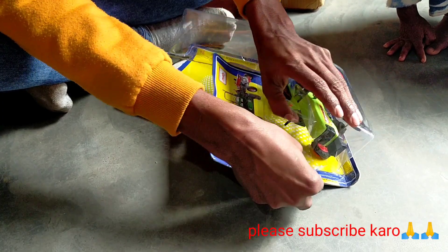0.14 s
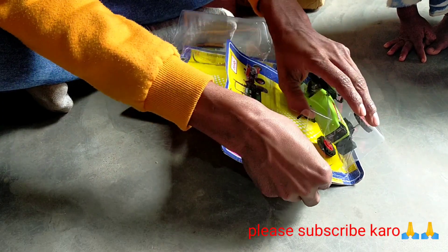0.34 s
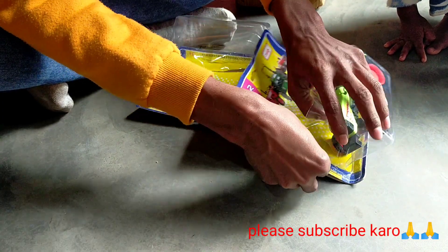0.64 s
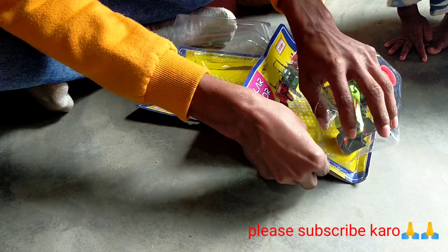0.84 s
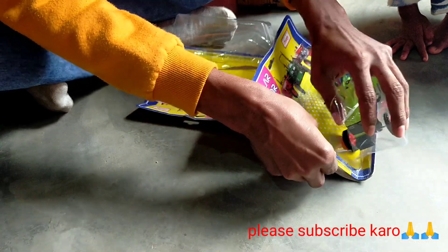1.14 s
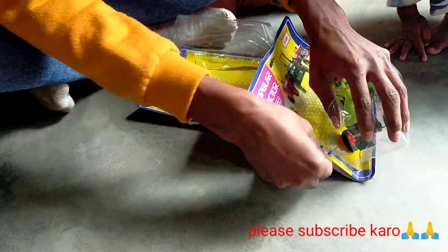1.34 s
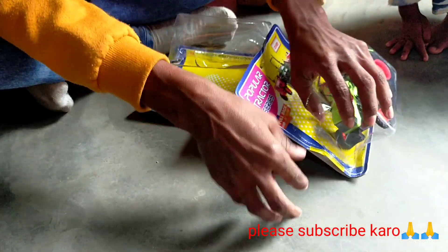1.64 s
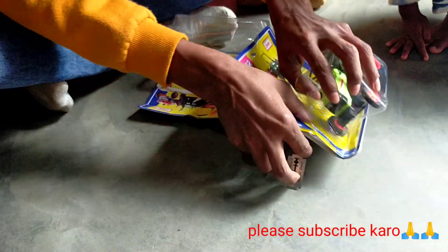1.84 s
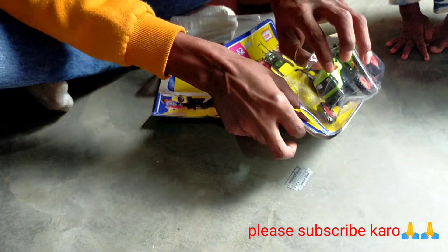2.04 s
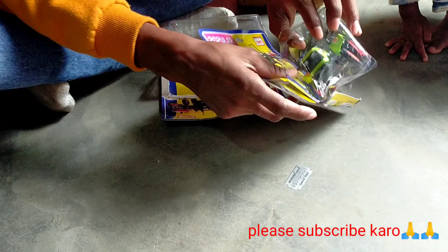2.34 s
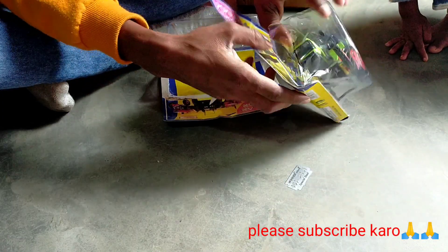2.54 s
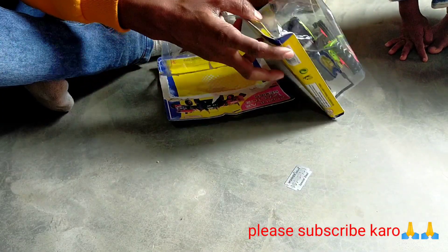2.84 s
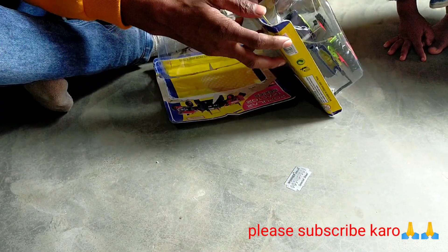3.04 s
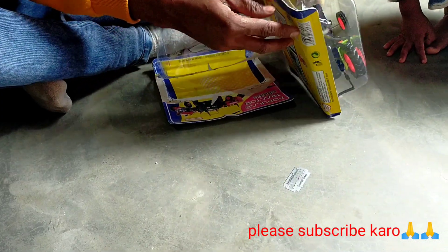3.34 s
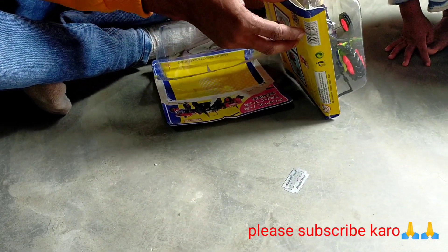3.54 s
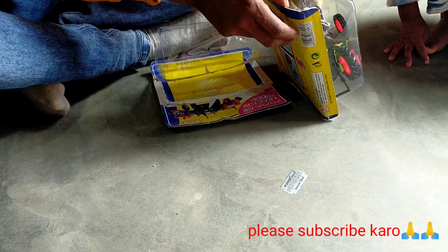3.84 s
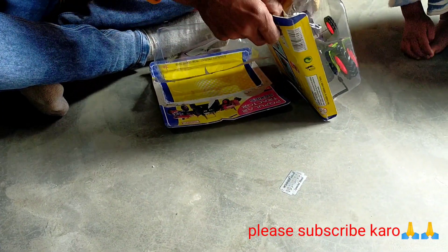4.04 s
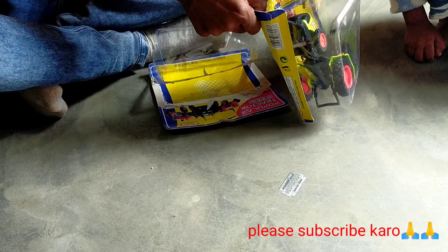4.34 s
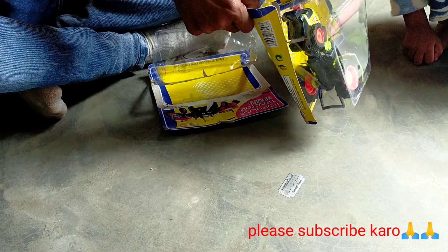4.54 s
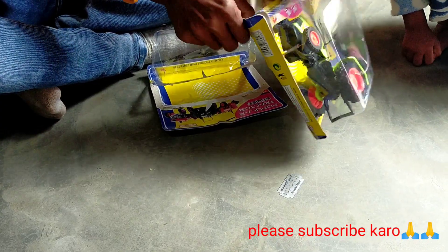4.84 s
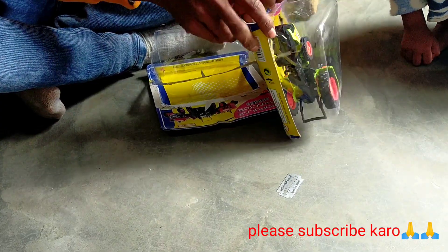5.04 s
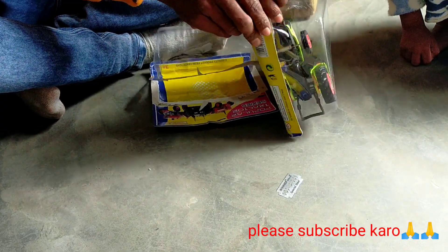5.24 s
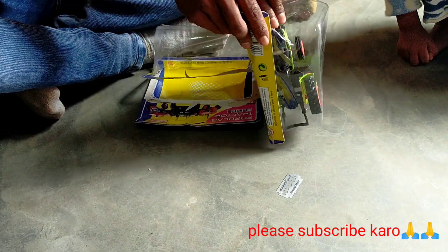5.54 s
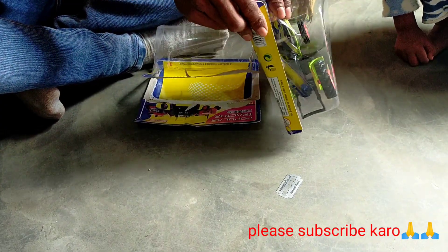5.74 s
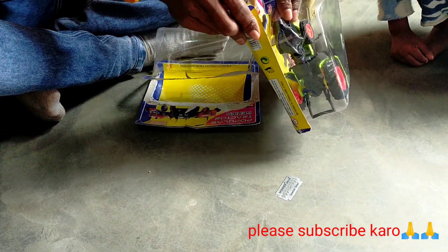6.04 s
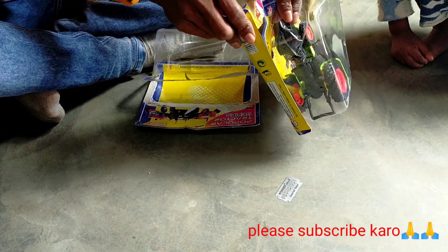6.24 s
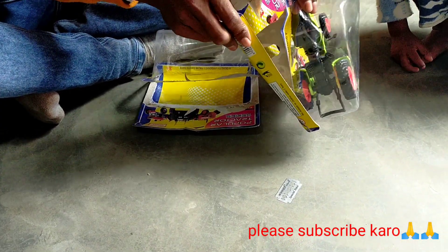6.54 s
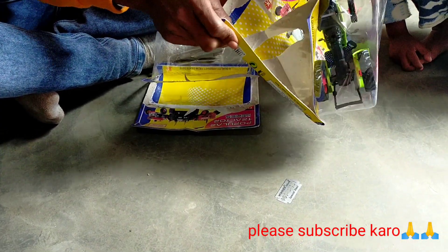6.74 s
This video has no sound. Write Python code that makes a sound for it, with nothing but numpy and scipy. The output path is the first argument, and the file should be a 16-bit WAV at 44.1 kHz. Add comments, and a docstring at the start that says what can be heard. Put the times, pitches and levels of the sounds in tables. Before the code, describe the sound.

A sharp plastic snap opens at 0 s. Within half a second come more snaps, soft low thumps and gritty scuffs of the pack on the floor. A tight cluster of strong pops falls around 0.6-0.9 s, then scattered snaps and crinkles near 1.3-1.65 s. A very short, thin, rising finger squeak passes at about 1.85 s, followed by another crackly cluster at 2.0-2.6 s. From 2.7 to 4.2 s it is quieter: faint creases, light rubbing, a dull bump near 3.5 s and a brief drag around 4.05 s. The loudest snap bursts out at 4.33 s with a thump; irregular buckling and crinkling continue, dense around 5.6-6.0 s with a firm knock at 6 s. Rubbing and pops persist, crowding into a bright crackling flurry from 6.65 s to the end. Close phone sound, small hard room, short bright tail.

```python
"""A sharp plastic snap comes first, then a quick run of snaps and bumps, a quieter stretch and a busy finish.
Hands pry a stiff clear plastic blister off its cardboard card, just above the floor of a small hard room.
The shell buckles in snaps that ring the sheet, the hollow under it and the card; between them creases crinkle,
fingers slide and squeak, and the pack scuffs and bumps on the floor. All of this is built from random grains,
damped rings and filters. A phone close by hears it with a short, bright room tail."""
import sys
import numpy as np
from scipy import signal
from scipy.fft import rfft, irfft
from scipy.io import wavfile
from scipy.ndimage import uniform_filter1d

SR = 44100
rng = np.random.default_rng(int(sys.argv[2]) if len(sys.argv) > 2 else 0)


def digitize_waveform(pressure):
    """Quantize a signal to 16-bit integers and store it at the path in sys.argv[1].

    Rows of a 2-D input are taken as channels; values are limited to [-1, 1].
    """
    field = np.atleast_2d(pressure).T
    bounded = np.clip(field, -1, 1)
    quanta = np.round(bounded * 32767).astype(np.int16)
    wavfile.write(sys.argv[1], SR, quanta)


N = 304290  # length in samples

# Buckling snaps: [t/s, sheet level/dB before the shell gain, sheet pitch/Hz, basic slip length/ms,
# body level/dB relative to the sheet, crack level/dB relative to the sheet]
SNAPS = [(0, -24.5, 2040, 1, 4.5, -16.5), (0.1223, -35, 2080, 4.5, 7.5, -30),
         (.139, -22, 1850, 1.4, 3.5, -19), (0.1928, -31, 1800, 8.2, -20, -17),
         (0.4085, -40.5, 1540, 5, 1, -12), (.5518, -53, 2110, 1.7, 0, 9.5),
         (0.636, -24.5, 2420, 1.8, -8, -16), (0.7577, -18, 1410, 6, 0.5, -21.5),
         (0.7945, -25.5, 1680, 2, -11, -21), (0.8134, -19, 2170, 3.9, -12, -22),
         (0.8401, -27, 1800, 4.1, 2.5, -13.5), (0.9167, -30.5, 2110, 0.48, -16, -3),
         (1.0705, -43, 1680, 3.6, -10, -21), (1.288, -23.5, 2110, 4.5, -3.5, -10.5),
         (1.4353, -46, 2030, 1.9, 1, -6), (1.4452, -31, 2390, 1.8, -9, -6.5),
         (1.4726, -28, 2220, 1, -14, -9), (1.4948, -38.5, 1850, 4.1, 8, -17),
         (1.5412, -18.5, 1820, 3.2, -2.5, -14), (1.638, -49, 1640, 2.4, 13.5, 6.5),
         (1.647, -38, 1450, 2.8, -6, -12), (1.9633, -42, 2260, 3.2, -4, 4),
         (2.0298, -37.5, 2000, 1.2, 1, -7), (2.054, -24.5, 1670, 4.5, 2, -34),
         (2.0626, -19.5, 1860, 2.5, -18, -23), (2.1017, -29.5, 2200, 2.5, -2.5, -10),
         (2.1568, -27, 2160, 2.1, -9, -22), (2.1969, -28.5, 2140, 1.4, -11, -11),
         (2.313, -44.5, 2080, 4.5, -12, -4), (2.4004, -45, 2000, 2.3, 3, -11),
         (2.438, -47, 2190, 4.8, 3.5, -5), (2.4866, -28.5, 1590, 1.8, 0.5, -10),
         (2.5318, -26.5, 2100, 2.4, -10, -11), (2.546, -30, 2080, 3.5, -27, -27),
         (2.6499, -32.5, 2080, 4.5, 3.5, -21), (2.966, -39, 2080, 3.8, 4.5, -10),
         (3.059, -37.5, 2410, 6.2, 3, -8), (3.3589, -34, 2130, 4.3, -11.5, -10),
         (3.41, -47, 2060, 2.3, 0, 6.5), (3.4424, -31.5, 2120, 9.3, 4, -10),
         (3.7534, -43, 1900, 3.8, 0.5, -6), (4.1631, -41, 1940, 2.3, -3.5, -6),
         (4.3301, -13, 1920, 2.3, -1.5, -20), (4.3738, -21, 2140, 0.41, -5, -18),
         (4.3817, -15.5, 1640, 1.5, -3.5, -18), (4.5481, -34, 1800, 1.2, 0, -30),
         (4.6069, -17.5, 2340, 0.93, -7, -17), (4.6229, -30.5, 1820, 3.7, 1, -2),
         (4.6752, -28, 1770, 0.63, 1.5, -11), (4.714, -36.5, 3040, 1.7, 1, -1.5),
         (4.8153, -32, 1780, 5.2, 5.5, -28), (4.8188, -21, 1780, 4.8, -2.5, -25),
         (4.916, -36.5, 2060, 2.4, -14, -41), (4.9497, -27, 2070, 2, -3.5, -17.5),
         (4.9712, -29, 2180, 9.7, -5.5, -12), (5.0368, -23, 1940, 6.9, 2, -15),
         (5.0558, -24.5, 1830, 5.1, 3, -11.5), (5.124, -41, 1870, 4.7, -13, -24),
         (5.22, -38.5, 1790, 8.4, -10, -10), (5.2832, -31.5, 1570, 6.3, 6.5, -14),
         (5.308, -39.5, 2180, 1.9, 6, -7), (5.423, -37, 1840, 28, 4, -5.5),
         (5.487, -35.5, 1640, 5.1, -1.5, -16), (5.59, -19, 2120, 3.6, -4, -16.5),
         (5.6683, -30.5, 1980, 2.7, -3, -7), (5.689, -24, 1870, 0.32, -10, -9.5),
         (5.705, -23, 1780, 7.3, 3.5, -19), (5.7258, -33, 2060, 2.7, -8, -0.5),
         (5.7731, -31, 1780, 5.7, 7.5, -7), (5.7806, -17, 1780, 0.12, 1, -21),
         (5.7977, -30, 1960, 2.6, -7, -8), (5.9095, -33.5, 1930, 1.7, -1.5, -3.5),
         (5.9453, -16, 2020, 1, -6.5, -19.5), (5.9756, -19, 1830, 5.5, -1, -11.5),
         (5.9953, -18, 2340, 4.5, -3, -10.5), (6.175, -26.5, 2420, 0.92, 1.5, -3),
         (6.197, -25, 1910, 2.8, 2.5, -8.5), (6.347, -26, 1920, 5.1, 2, -14.5),
         (6.3657, -31, 1800, 1.7, -24, -38), (6.472, -17.5, 1800, 6.8, -3, -12.5),
         (6.557, -27.5, 2050, 9.9, -15, -12), (6.6639, -28, 2120, 1.4, 2, -11),
         (6.7205, -24.5, 2340, 8.1, -2, -24), (6.7387, -20.5, 1390, 2.2, -2.5, -21),
         (6.7581, -17, 2500, .7, -3, -24), (6.7746, -27, 1850, 3.6, 8, -5),
         (6.7856, -18, 2080, 6.4, -13, -16.5), (6.7964, -24, 2260, 6.5, -14, -17),
         (6.8028, -21, 2780, 32, -24, -9), (6.8401, -22.5, 2620, 11, -27, -12.5)]
# Strokes of plastic rubbing over card or fingers, and short runs of crackle as creases settle just after some
# snaps: [t/s, length/s, crinkle level/dB, hiss level/dB], mid-stroke
SLIDES = [(0.431, 0.024, -49, -51), (0.488, 0.021, -47.5, -46.5), (0.683, 0.06, -39.5, -58),
          (1.026, 0.057, -63, -52.5), (1.292, 0.041, -41.5, -47), (1.489, 0.016, -36, -43),
          (1.563, 0.031, -42, -46), (1.585, 0.062, -47, -64), (1.84, 0.13, -61, -65),
          (1.921, 0.052, -47.5, -41.5), (2.004, 0.048, -42, -52), (2.234, 0.054, -48, -55),
          (2.395, 0.045, -50, -57), (2.63, 0.052, -44, -41.5), (2.771, 0.013, -57, -81),
          (2.906, 0.13, -50, -62), (3.042, 0.12, -53, -63), (3.252, 0.097, -54.5, -66.5),
          (3.445, 0.05, -49, -68), (3.629, 0.051, -67, -69), (3.777, 0.14, -69, -69),
          (4.025, 0.093, -51, -60), (4.225, 0.055, -56, -66), (4.288, 0.049, -50, -53),
          (4.339, 0.11, -36, -42), (4.548, 0.065, -55, -56), (4.704, 0.073, -45.5, -51.5),
          (4.795, 0.03, -48.5, -45.5), (4.959, 0.035, -41, -43.5), (5.14, 0.12, -58, -64.5),
          (5.285, 0.019, -33, -42.5), (5.361, .14, -49.5, -55), (5.705, 0.059, -41, -58),
          (5.781, 0.061, -36, -53), (6.007, 0.053, -33.5, -42), (6.17, 0.059, -34.5, -52),
          (6.443, 0.15, -34.5, -43.5), (6.665, .095, -41, -47), (6.763, 0.069, -34, -65)]
# Film ticking under the grip: [t/s, crinkle level/dB, hiss level/dB], both before the gains in handling()
TICKING = [(0.0, -44.5, -62), (0.33, -45, -70), (0.69, -56.5, -61.5), (1.29, -53.5, -72),
           (1.44, -49.5, -71), (1.88, -57, -72), (2.08, -44, -73), (2.21, -47.5, -64), (2.82, -53.5, -69.5),
           (3.28, -56, -70.5), (3.5, -50.5, -77.5), (4.04, -58.5, -74.5), (4.55, -44, -55.5),
           (5.0, -49, -69), (5.4, -51, -72), (5.82, -47.5, -67), (6.23, -49.5, -61), (6.9, -35.5, -52)]
# Card scuffing the floor: [t/s, level/dB before the gain in handling()]
SCUFFING = [(0, -59), (.12, -50), (.25, -41), (.48, -42), (.6, -46.5), (.7, -41), (.85, -53.5), (1.2, -58),
            (1.9, -59), (2.1, -57), (2.8, -56), (3.05, -56.5), (3.6, -56), (3.98, -61), (4.4, -50),
            (4.85, -58.5), (5.1, -50.5), (6.9, -57.5)]
# Pack dragged over the gritty floor: [t/s, length/s, level/dB mid-stroke, bright grit/dB relative to the drag]
DRAGS = [(0.166, 0.092, -41, -6), (0.202, 0.041, -38.5, -12), (0.229, 0.11, -40, -23),
         (0.422, 0.12, -50.5, -17), (0.695, 0.067, -51, -16), (2.648, 0.053, -42.5, -0.5),
         (3.434, 0.094, -45.5, -34), (4.044, 0.06, -46.5, -27)]
# Fingertip squeaking over the film: [t/s, middle pitch/Hz, middle level/dB]
SQUEAK = [(1.836, 6660, -60), (1.842, 7100, -44), (1.855, 7960, -35), (1.874, 7850, -48),
          (1.886, 8900, -42), (1.897, 9100, -72)]
# Dull bumps of the pack on the floor: [t/s, level/dB, pitch/Hz, time to fall by 60 dB/s]
BUMPS = [(.14, -30.5, 133, 0.53), (.246, -23, 160.2, 0.37), (0.313, -28, 149, 0.19), (.441, -31, 128, 0.22),
         (0.527, -32, 153, 0.13), (2.661, -53, 160, .14), (2.927, -42, 158, .2), (3.489, -33.5, 161, 0.3),
         (4.382, -23, 183, .12), (5.708, -29, 180, 0.061), (5.993, -19, 235, 0.084),
         (6.767, -33.5, 170, 0.24), (6.784, -23.5, 96.5, 0.054)]

# Tone colours, as filter shapes; each one lists [f/Hz, level/dB]
# the ringing plastic sheet
SHEET_COLOUR = [(300, -24), (700, -10), (1200, 4), (1800, -0.5), (2800, -4.5), (3600, -11.5), (6000, -31.5),
                (12000, -20.5)]
# the cardboard card
CARD_COLOUR = [(50, -42), (100, -18), (165, -3.5), (260, 3), (400, -3), (540, -18), (800, -2.5),
               (2000, -65)]
# the tearing crease
CRACK_COLOUR = [(2500, -19.5), (3700, 2), (4800, -1.5), (5700, -6), (7000, -0.5), (8100, 2), (9300, -7.5),
                (12500, -16), (15200, -20), (16500, -26)]
# the bright crackle that follows a snap
AFTERCRACK_COLOUR = [(2500, -8), (3800, -10), (5600, -6), (7000, -14), (8200, 8), (9700, -1), (12500, -11),
                     (15200, -4), (16500, -22)]
# small creases bending
CRINKLE_COLOUR = [(200, -21.5), (550, 6), (800, 15.5), (1050, 8.5), (1600, 11.5), (2400, 10.5), (3100, 2),
                  (3900, -19.5), (6000, -21), (12000, -54)]
# skin and film sliding
HISS_COLOUR = [(2000, -21), (4000, -5), (5600, -8.5), (7000, -2.5), (8200, 9), (9700, -4), (12500, -5.5),
               (14200, -6), (15200, 6.5), (16500, -1)]
# the card scuffing the floor
SCUFF_COLOUR = [(25, -46), (55, -16), (85, -7), (125, 3), (170, 0), (220, 2), (350, -5.5), (550, -12),
                (1000, -22.5), (3000, -51)]
# the dull part of the drag over grit
DRAG_COLOUR = [(60, -25), (100, 1.5), (145, 9.5), (210, 4), (330, -1.5), (520, 5), (800, 0), (1400, -4.5),
               (2600, -14), (5000, -57)]
# the room tail
ROOM_COLOUR = [(60, 0), (150, -4), (280, -2), (800, -3), (2000, -7.5), (3200, -1.5), (5000, -2.5),
               (7000, -2), (8500, -3), (11000, -0.5), (15000, -5)]

# How long the room tail takes to fall by 60 dB: [f/Hz, time/s]
ROOM_T60 = [(100, 0.62), (260, 0.14), (800, 0.13), (2000, 0.18), (5000, 0.22), (13000, 0.076)]
# Reflections off floor, body and wall: [delay/s before a random stretch, level/dB]
REFLECTIONS = [(.0021, -6), (.0047, -13.5), (0.0132, -15.5)]

TOP_HZ = 15650  # the phone's upper limit
SNAP_SIZE = 2048  # length of one snap, and of a colour filter, in samples
# settling creases: levels relative to the listed sheet and crack levels, and the fade's time constant
SETTLE_CRINKLE_DB, SETTLE_HISS_DB, SETTLE_S = -13.5, -11.5, 0.019
# the card relative to the hollow at the start; its share grows as the card comes free
CARD_DB, CARD_FREED_DB_PER_S = -11, 1.0154


def shell(gain_db=-7.5, count=7):
    """Snaps come from several places on the shell, each with its own room paths; card and hollow are its body."""
    places = np.zeros((count, N))
    for k, (s, db, hz, slip_ms, body_db, crack_db) in enumerate(SNAPS):
        card_db = body_db + CARD_DB + CARD_FREED_DB_PER_S * s
        sound = snap(db, hz, slip_ms, card_db, body_db, crack_db)
        add(places[k % count], s, undb(db + gain_db) * sound)
    return sum(room(place) for place in places)


def snap(sheet_db, hz, slip_ms, card_db, hollow_db, crack_db, slip_rate=5000, slip_size=0.67,
         detune=0.064, build_ms=0.5, tear_ms=0.46, top_db=-4.5):
    """A crease pops through and runs on in ever smaller slips; sheet, hollow and card ring with them."""
    ms = np.arange(SNAP_SIZE) / SR * 1000
    fade = np.exp(-(ms / max(slip_ms + 0.69, 0.2)) ** 1.47)
    run = fade * (1 - np.exp(-ms / build_ms))
    slips = rng.random(SNAP_SIZE) < slip_rate / SR
    push = slip_size * run * slips * rng.standard_normal(SNAP_SIZE)
    push[int(build_ms * SR / 1000)] = 1  # the main pop

    # the grip bends the shell, so its resonances shift from snap to snap
    bend = np.exp(detune * rng.standard_normal(6))
    sheet = resonate(push, hz, 640)
    sheet = sheet + 0.5 * resonate(push, 1520 * bend[0], 136)
    sheet = sheet + 0.26 * resonate(push, 2200 * bend[1], 220)
    hollow = resonate(resonate(push, 780 * bend[2], 146), 874, 840)
    card = push + 0.55 * resonate(push, 290 * bend[5] ** 2, 87)

    # the crease itself tears along finely and has short, high rings
    fine = run * (1 - np.exp(-ms / tear_ms)) * rng.standard_normal(SNAP_SIZE) + 0.5 * push
    wide = 1.37 * undb(0.5 * (sheet_db + 29.5))  # big creases favour the lower ring
    low_ring = wide * resonate(fine, 5100 * bend[3] ** 1.9, 700)
    high_ring = 2.3 * resonate(fine, 7500 * bend[4] ** 1.47, 760)
    crease = 0.49 * fine + 0.51 * (low_ring + high_ring)

    # tiny creases hardly move the sheet and have the strongest very high tick
    tick_db = top_db + 0.13 * (min(crack_db, 0) + 17) - 0.46 * (sheet_db + 28)
    tick = unit(resonate(resonate(fine, 16300, 2500), 21000, 5600)) * undb(tick_db)
    crack = unit(colour(crease, CRACK_COLOUR)) + tick

    parts = (colour(sheet, SHEET_COLOUR), hollow, colour(card, CARD_COLOUR), crack)
    levels_db = (0, hollow_db, card_db, crack_db)
    sound = sum(unit(part) * undb(db) for part, db in zip(parts, levels_db))
    return sound * rng.choice([-1, 1])


def settling(rise_s=0.0023):
    """Every snap leaves strain that crackles away, the more the harder it was."""
    dull_power, bright_power = np.zeros(N), np.zeros(N)
    t = np.arange(SR // 2) / SR
    fade = (1 - np.exp(-t / rise_s)) * np.exp(-t / SETTLE_S)
    for s, db, *_, crack_db in SNAPS:
        add(dull_power, s, (fade * undb(db + SETTLE_CRINKLE_DB)) ** 2)
        add(bright_power, s, (fade * undb(db + crack_db + SETTLE_HISS_DB)) ** 2)
    ticks = flecks(rate=790, spread_db=5.5)
    dull = even(colour(ticks, CRINKLE_COLOUR), span_s=0.017)
    bright = even(colour(ticks, AFTERCRACK_COLOUR), span_s=0.028)
    return dull * np.sqrt(dull_power) + bright * np.sqrt(bright_power)


def handling(crinkle_db=-9.5, hiss_db=0.5, scuff_db=1.0, catch_db=5.0):
    """Small creases crinkle, skin and film slide in fine grains, the card scuffs the floor."""
    _, _, rub_db, rub_hiss_db = np.transpose(SLIDES)
    catching = undb(catch_db * walk(130))  # the film catches and lets go
    creases = grains(rate=2600, spread_db=1.5) * catching
    crinkle = even(colour(creases, CRINKLE_COLOUR), span_s=0.017)
    slips = grains(rate=4700, spread_db=7.0) * catching
    hiss = even(colour(slips + 0.5 * creases, HISS_COLOUR))
    rubbing = crinkle * strokes(SLIDES, rub_db) + hiss * strokes(SLIDES, rub_hiss_db)

    # a ticking layer runs beneath the strokes
    ticks = flecks(rate=490, spread_db=5.5)
    tick_crinkle_db, tick_hiss_db = follow(TICKING)
    tick_crinkle = even(colour(ticks + 0.95 * creases, CRINKLE_COLOUR), span_s=0.017)
    tick_hiss = even(colour(ticks + 0.32 * creases, HISS_COLOUR), span_s=0.018)
    ticking = tick_crinkle * undb(tick_crinkle_db + crinkle_db)
    ticking += tick_hiss * undb(tick_hiss_db + hiss_db)

    # the scuffing booms at two close, low resonances
    grit = grains(rate=700, spread_db=1.0) * catching
    boom = 0.74 * resonate(grit, 130, 20) + 0.67 * resonate(grit, 138, 22)
    scuff = even(colour(grit + boom, SCUFF_COLOUR), span_s=0.13)
    return rubbing + ticking + scuff * undb(follow(SCUFFING)[0] + scuff_db)


def drags():
    """Grit rolls under the card: random grains make a dull rasp and a brighter crunch."""
    _, _, db, grit_db = np.transpose(DRAGS)
    grit = grains(rate=700, spread_db=-1.5)
    rasp = even(colour(grit, DRAG_COLOUR)) * strokes(DRAGS, db)
    crunch = even(colour(grit, CRINKLE_COLOUR)) * strokes(DRAGS, db + grit_db)
    return rasp + crunch


def squeak(waver=0.0242, hiss_db=-6):
    """Very fast, unsteady stick and slip of skin on film: a wavering tone with hiss."""
    s, *columns = np.transpose(SQUEAK)
    t = np.arange(N) / SR
    hz, db = (np.interp(t, s, column) for column in columns)
    phase = 2 * np.pi * np.cumsum(hz * (1 + waver * walk(3000))) / SR
    hiss = unit(colour(rng.standard_normal(N), HISS_COLOUR))
    sound = np.sin(phase) + undb(hiss_db) * hiss
    return sound * undb(db + 2.7 * walk(400)) * (t > s[0]) * (t < s[-1])


def bumps():
    """The pack and the hand knock softly on the floor, each knock a fading low tone."""
    out, t = np.zeros(N), np.arange(SR // 2) / SR
    for s, db, hz, t60 in BUMPS:
        swell = (1 - np.exp(-t / 0.00083)) * np.exp(-np.log(1000) * t / t60)
        add(out, s, undb(db) * swell * np.sin(2 * np.pi * hz * t))
    return out


def room(x, wet_db=-2.5, onset_s=0.0096):
    """A few near reflections, and a short diffuse tail that is rich in treble."""
    t = np.arange(SR // 2) / SR
    hz = np.fft.rfftfreq(len(t), 1 / SR)
    noise = rfft(rng.standard_normal(len(t)))
    octave = np.round(np.log2(np.maximum(hz, 2 ** 6)))
    tail = 0
    for k in np.unique(octave):  # each octave fades at its own pace
        fade = np.exp(-np.log(1000) * t / read(ROOM_T60, 2 ** k))
        fade = fade * (1 - np.exp(-(t / onset_s) ** 2))
        tail = tail + irfft(noise * (octave == k), len(t)) * fade / np.linalg.norm(fade)
    response = undb(wet_db) * colour(tail, ROOM_COLOUR)
    response[0] += 1  # the direct sound
    for delay, db in REFLECTIONS:
        add(response, delay * rng.uniform(0.7, 1.4), undb([db]))
    return signal.oaconvolve(x, response)[:N]


def wander(x, turn_hz=3.1, count=4):
    """The rubbing spot moves over the pack, so its paths through the room keep changing."""
    place = np.arange(N) / SR * turn_hz * count
    away = [(place - k + count / 2) % count - count / 2 for k in range(count)]
    # fade smoothly from each place to the next
    return sum(room(x * np.cos(np.pi / 2 * np.clip(a, -1, 1))) for a in away)


def grains(rate, spread_db):
    """Tiny slips at random times; rate is per second, and spread_db makes their sizes differ."""
    happens = rng.random(N) < rate / SR
    size = np.minimum(rng.exponential(size=N), 4)
    return unit(happens * undb(spread_db * size) * rng.choice([-1, 1], N))


def flecks(rate, spread_db, length_s=0.0028):
    """Small creases at random times, each a brief fizz of fading noise."""
    keep = np.exp(-2 / (length_s * SR))
    energy = signal.lfilter([1], [1, -keep], grains(rate, spread_db) ** 2)
    return unit(np.sqrt(energy + 1e-18) * rng.standard_normal(N))


def strokes(table, levels_db, edge_s=0.01, easing_db=3.0):
    """Gain over time of short strokes: they start over one edge, ease off and stop over another."""
    out, t = np.zeros(N), np.arange(SR // 2) / SR
    for (s, length, *_), db in zip(table, levels_db):
        gate = np.clip(np.minimum(t, length + edge_s - t) / edge_s, 0, 1)
        easing = easing_db * (0.5 - np.minimum(t / length, 1))
        add(out, s, gate * undb(db + easing))
    return out


def resonate(x, hz, width_hz):
    """One damped resonance; a wider one dies away sooner."""
    return signal.lfilter(*signal.iirpeak(hz, hz / width_hz, fs=SR), x)


def colour(x, points):
    """Filter to the given (Hz, dB) shape, reacting only after each input (minimum phase)."""
    log_gain = read(points, np.fft.rfftfreq(SNAP_SIZE, 1 / SR)) * np.log(10) / 20
    cepstrum = irfft(log_gain)
    half = SNAP_SIZE // 2 - 1
    fold = np.r_[1, np.full(half, 2), 1, np.zeros(half)]
    return signal.fftconvolve(x, irfft(np.exp(rfft(cepstrum * fold))))[:len(x)]


def even(x, span_s=0.03):
    """Hold the rms near 1 over each short span and keep the finer grain."""
    power = uniform_filter1d(x ** 2, int(span_s * SR))
    return x / np.sqrt(np.maximum(power, 1e-6))


def walk(rate):
    """Slow chance with a spread near 1, drawing a new value rate times a second."""
    hold = int(SR / rate)
    steps = np.repeat(rng.standard_normal(N // hold + 1), hold)
    return unit(uniform_filter1d(steps, hold)[:N])


def follow(curve):
    """Join (s, value, ..) rows by straight lines, one track for each column."""
    s, *columns = np.transpose(curve)
    return [np.interp(np.arange(N) / SR, s, column) for column in columns]


def read(points, hz):
    """Read (Hz, value) points on a log-frequency axis."""
    f, value = np.transpose(points)
    return np.interp(np.log(np.maximum(hz, 1)), np.log(f), value)


def add(track, s, sound):
    """Mix a sound in at a time in seconds."""
    start = max(int(s * SR), 0)
    part = sound[:max(len(track) - start, 0)]
    track[start:start + len(part)] += part


def undb(db):
    """Decibels to gain."""
    return 10 ** (np.asarray(db) / 20)


def unit(x):
    """Scale to rms 1."""
    return x / np.sqrt(np.mean(x ** 2) + 1e-24)


def scene():
    """The pack in the room; the bumps come through the floor, without the room."""
    rubbing = handling() + settling() + drags() + squeak()
    return (shell() + wander(rubbing) + bumps())[None]


def record(dry, low_cut_hz=68):
    """The phone thins the deep bass, clips at full scale and cuts the top."""
    low_cut = signal.butter(3, low_cut_hz, "high", fs=SR, output="sos")
    top_cut = signal.ellip(10, 0.2, 70, TOP_HZ, fs=SR, output="sos")
    thin = signal.sosfilt(low_cut, dry)
    return signal.sosfilt(top_cut, np.clip(thin, -1, 1))


dry = scene()
out = record(dry)
digitize_waveform(out)
```